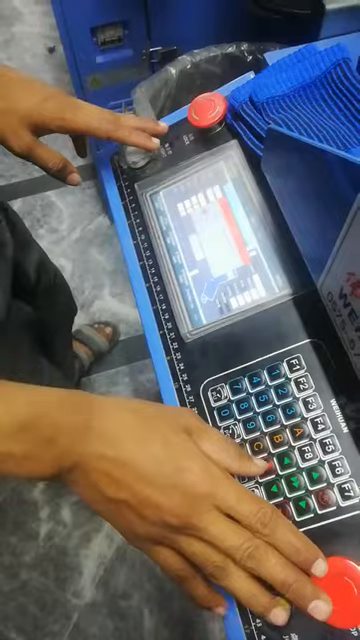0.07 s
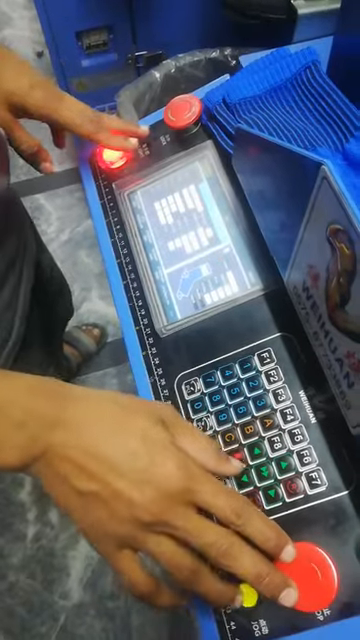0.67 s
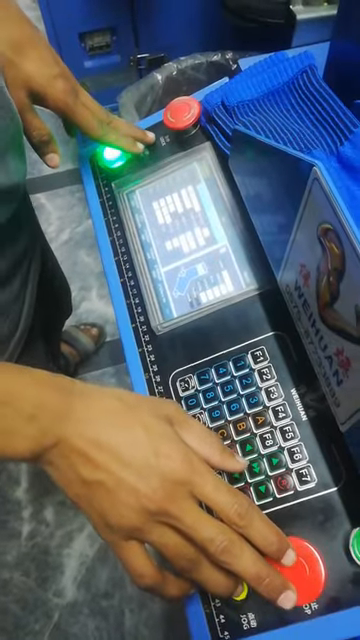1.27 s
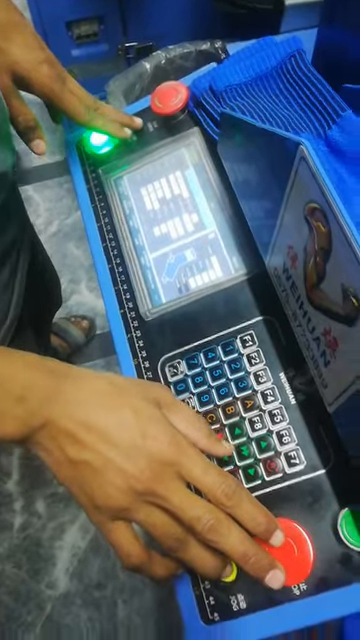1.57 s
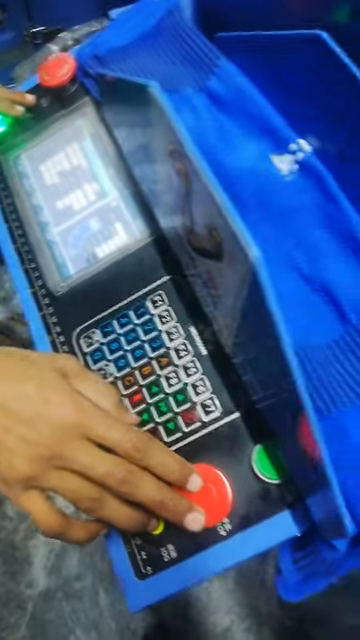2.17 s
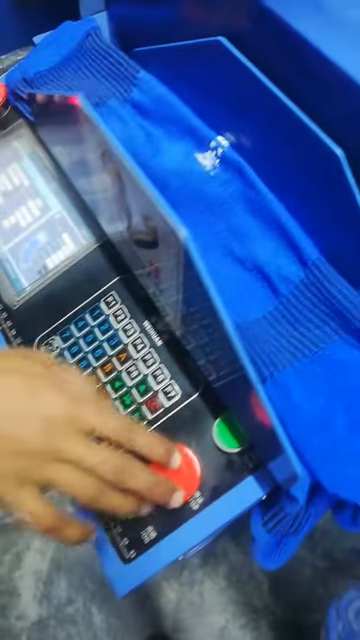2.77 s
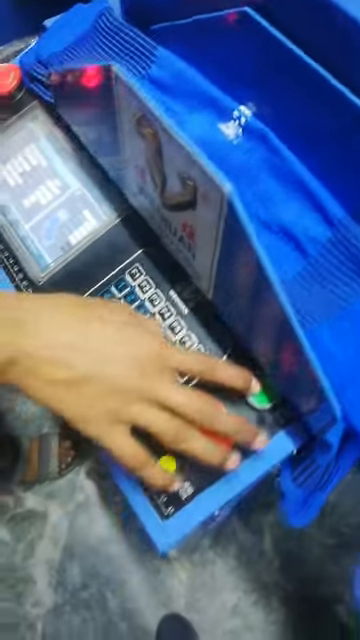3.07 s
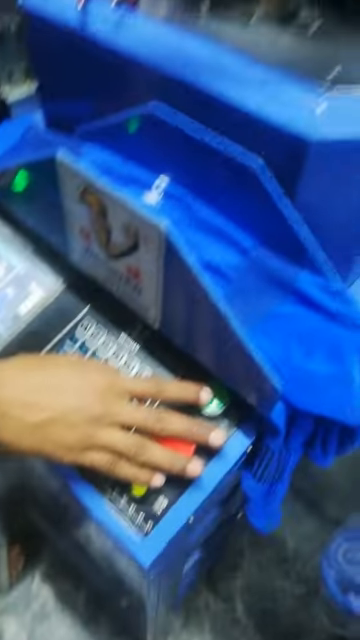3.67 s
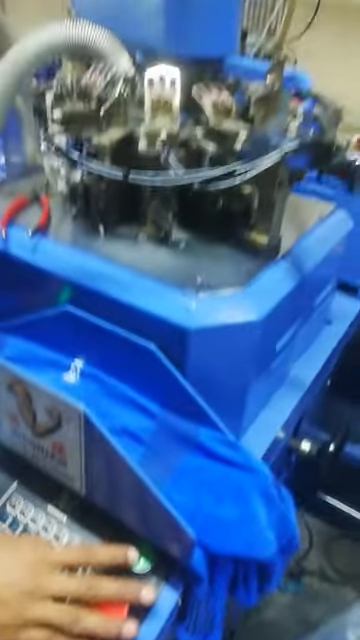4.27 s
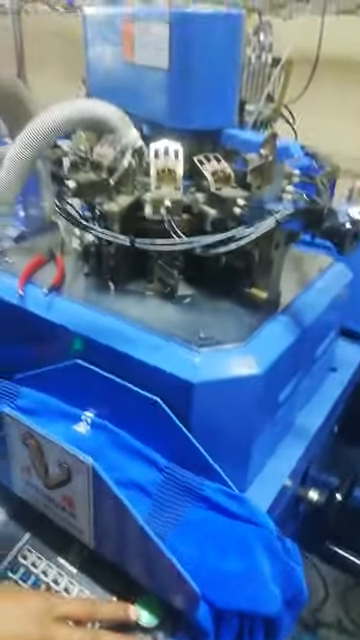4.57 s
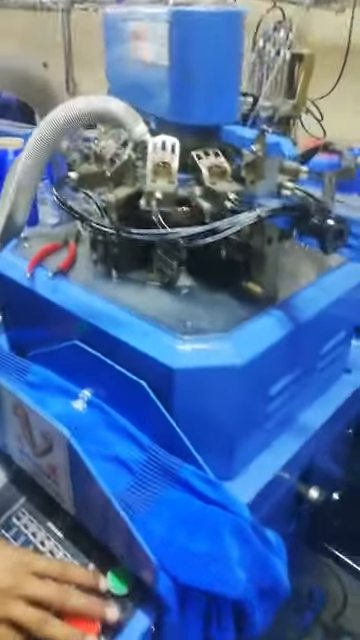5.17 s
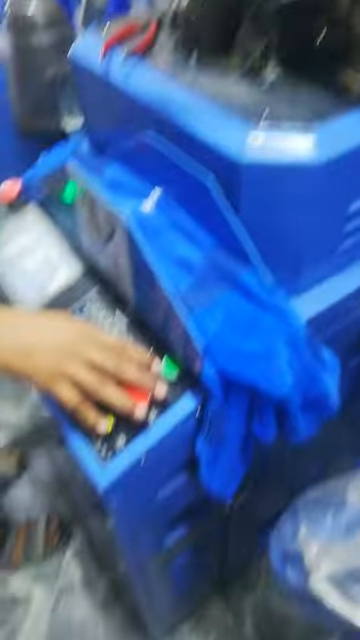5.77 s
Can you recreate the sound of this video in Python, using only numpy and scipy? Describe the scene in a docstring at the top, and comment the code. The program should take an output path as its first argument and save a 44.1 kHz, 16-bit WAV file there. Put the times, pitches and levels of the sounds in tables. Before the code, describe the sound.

Close to a running sock knitting machine in a workshop, a steady drone and whirr mix with air hissing through a pipe and a whine that pulses about four times a second. It starts abruptly, slightly louder for a moment, then evens out. One crisp button click sounds near the microphone on the left. Later a few faint clacks knock inside the machine, and the whole noise becomes slightly fuller.

```python
"""A circular sock knitting machine runs in a workshop, heard close up from its control panel.
Its needles pass the cams in a whine that throbs once a turn; the frame drones, motors hum and beat,
and suction air hisses. The mechanism clacks faintly and a panel button clicks once.
The sound cuts in with an opening swell in which the whole machine sounds louder, then settles.
It sits mostly to the left and grows a little as the microphone turns to the knitting head."""
import sys
import numpy as np
from scipy import signal
from scipy.fft import rfft, irfft
from scipy.io import wavfile

SR = 44100
rng = np.random.default_rng(int(sys.argv[2]) if len(sys.argv) > 2 else 0)


def transcribe(signal):
    """Save signal, clipped to [-1, 1], as a 16-bit WAV file at the path in sys.argv[1]."""
    frames = np.atleast_2d(signal).T
    limited = np.clip(frames, -1, 1)
    pcm = np.round(limited * 32767).astype(np.int16)
    wavfile.write(sys.argv[1], SR, pcm)


N = 265923
TIME = np.arange(N) / SR
FREQS = np.maximum(np.arange(N // 2 + 1) * SR / N, 1)
NEEDLES, TURNS_PER_S = 144, 3.8533
TIGHT_SPOT_S = .497   # the cylinder's tight spot passes the cams now, and once every turn
FRAME_HOLD_S = .15   # the opening swell lasts this much longer in the frame and cams


def from_db(db):
    """Decibels to gain."""
    return 10 ** (np.asarray(db) / 20)


def rms_one(x):
    """Scale so that the mean of the channels has rms 1."""
    return x / np.sqrt(np.mean(np.atleast_2d(x).mean(0) ** 2) + 1e-20)


def in_time(rows):
    """Each column of a curve at every sample."""
    s, *columns = np.transpose(rows)
    return [np.interp(TIME, s, c) for c in columns]


def at_hz(points):
    """A table over log frequency, read at every bin."""
    hz, value = np.transpose(points)
    return np.interp(np.log(FREQS), np.log(hz), value)


def colour(points):
    """Gain of a spectrum that falls away steeply beyond its ends."""
    skirts = np.minimum(FREQS / points[0][0], 1) * np.minimum(points[-1][0] / FREQS, 1)
    return from_db(at_hz(points)) * skirts ** 4


def resonances(modes):
    """Gain of parallel resonances with steep skirts."""
    return sum(from_db(db) / (1 + ((FREQS - hz) / width) ** 2) ** 2 for hz, width, db in modes)


def drift(rate_hz):
    """Slow random wander of rms 1."""
    return rms_one(irfft(rfft(rng.standard_normal(N)) / (1 + (FREQS / rate_hz) ** 2) ** 2, N))


def swells(rows):
    """Rounded, flat-topped bumps, each of its own height."""
    return sum(height / (1 + (2 * (TIME - s) / length) ** 4) for s, length, height in rows)


def opening(lag_s=0, longer_s=0, start_s=.3, attack_s=.11, hold_s=.17, release_s=.13):
    """Envelope of the opening swell, 0-1: the machine sounds louder, then settles."""
    age = TIME - start_s - lag_s
    end = attack_s + hold_s + longer_s + release_s
    return np.clip(np.minimum(age / attack_s, (end - age) / release_s), 0, 1)


# Where the microphone points, from panel to knitting head: (time [s], facing the head [0-1])
MIC_AIM = [(2.6, 0.7), (3.7, 0.5), (4.05, 1), (4.8, 1), (6.03, 1)]
def layer_db(levels, lift):
    """A layer's level at the microphone, from (steady [dB], opening adds [dB], facing head adds [dB])."""
    steady_db, opening_db, facing_db = levels
    facing, = in_time(MIC_AIM)
    return steady_db + opening_db * lift + facing_db * facing


# The longer path to the microphone's right port: (frequency [Hz], delay [s])
RIGHT_DELAY = [(300, 0.00062), (600, 0.00081), (950, 0.00081), (1250, 0.00045), (2000, 0.00055),
               (4000, 0.000425)]
def port_lag(hz):
    """Direct sound bends round the microphone's body and reaches the right port later."""
    return np.interp(hz, *np.transpose(RIGHT_DELAY))


def tone(hz, phase, balance_db):
    """A sine of rms 1 on the left, later and balance_db down on the right."""
    arrival = np.array([TIME, TIME - port_lag(hz)])
    return np.sqrt(2) * np.sin(2 * np.pi * hz * arrival + phase) * from_db([[0], [-balance_db]])


def room_ripple(count=1400):
    """Workshop reflections leave peaks and dips of about a decibel, different at each port."""
    knots = np.linspace(0, SR / 2, count)
    return from_db([np.interp(FREQS, knots, row) for row in rng.standard_normal((2, count))])


# The machine stands to the microphone's left: (frequency [Hz], left over right [dB])
MIC_BALANCE = [(60, .5), (140, 0.9), (210, 1.4), (330, 4), (450, 7.5), (770, 6.8), (1100, 3.5), (1900, 4.8),
               (2800, 8.7), (4500, 12.5), (7500, 9.3), (9500, 12.5), (12000, 9.8), (15000, 17)]
# Direct sound at the right port: (frequency [Hz], share [0-1])
DIRECT_SHARE = [(150, 1), (330, 0.99), (440, 0.57), (900, 0.8), (1100, 0.12), (1350, 0.092), (1900, 0.3),
                (2500, 0.11), (4000, 0.053), (8000, 0.019)]
def at_ports(gain, source=None):
    """Filtered noise, or a source, at the microphone; the right port mixes it with diffuse room noise."""
    left, room = rfft(rng.standard_normal((2, N)))
    if source is not None:
        left = rfft(rms_one(source))
    direct = np.clip(at_hz(DIRECT_SHARE), 0, 1)
    diffuse = np.sqrt(1 - direct ** 2)
    right = direct * left * np.exp(-2j * np.pi * FREQS * port_lag(FREQS)) + diffuse * room
    ports = np.array([left, right * from_db(-at_hz(MIC_BALANCE))])
    return rms_one(irfft(ports * gain * room_ripple() ** diffuse, N))


# The whine's two partials, from the head on the left:
# (multiple of needle rate, lag at the catch [0-1], dip at the catch [0-1], left over right [dB])
WHINE_PARTIALS = [(1, 1, .55, 10), (2, .3, 0, 4.8)]
# Depth of the once-a-turn throb: (time [s], lower partial [0-1], upper partial [0-1])
THROB_DEPTH = [(.3, .5, .9), (1.7, .45, .8), (2.6, .08, 1), (3.5, .04, 1), (4.2, 0, .8), (6.03, 0, .8)]
# The stitch cams ease off and the lower partial dips:
# (place after the tight spot [turns], width [turns], depth [0-1])
CAM_EASINGS = [(.22, .08, .58), (.53, .05, .4)]
# The upper partial sings out: (time [s], length [s], boost [dB])
UPPER_SWELLS = [(2.7, 1.5, 3.8)]
def needle_whine(catch_lead_s=.062, catch_sharpness=.78):
    """Needles pass the cams; once a turn the cylinder catches, so the tone dips, lags and recovers."""
    angle = 2 * np.pi * TURNS_PER_S * (TIME - TIGHT_SPOT_S)
    catch = 1 - catch_sharpness * np.exp(1j * (angle + 2 * np.pi * TURNS_PER_S * catch_lead_s))
    place = angle / (2 * np.pi) % 1
    contact = 1 - sum(depth * np.exp(-((place - at) / width) ** 2) for at, width, depth in CAM_EASINGS)
    lift = opening(lag_s=.031, longer_s=FRAME_HOLD_S)
    lower = contact * from_db(layer_db((-41.8, 3.8, 5), lift))
    upper = from_db(layer_db((-40.2, 5.8, -8), lift) + swells(UPPER_SWELLS))
    out = 0
    for partial, depth, gain in zip(WHINE_PARTIALS, in_time(THROB_DEPTH), (lower, upper)):
        multiple, lag, dip, balance_db = partial
        throb = (1 + depth * np.cos(angle)) * np.minimum(np.abs(catch), 1) ** dip
        out += gain * throb * tone(multiple * NEEDLES * TURNS_PER_S, lag * np.angle(catch), balance_db)
    return out


# Clear tones near the head: (multiple of turn rate, relative level [dB], left over right [dB])
CAM_HARMONICS = [(125, -53, 8), (132, -50.5, 8), (147, -51, 8), (234, -53, 5), (252, -51.5, 5),
                 (282, -47.5, 4), (283, -49.5, 4), (285, -48.5, 4), (291, -51, 4), (297, -49, 4)]
def cam_tones(pulse_turns=.1):
    """The cams sing, louder as the microphone faces them; their tones beat and fall in step once a turn."""
    facing, = in_time(MIC_AIM)
    in_step = 2 * np.pi * (TURNS_PER_S * TIGHT_SPOT_S + pulse_turns)
    tones = sum(from_db(db) * tone(multiple * TURNS_PER_S, -multiple * in_step, balance_db)
                for multiple, db, balance_db in CAM_HARMONICS)
    return from_db(-12 * (1.5 - facing)) * tones


# Parts that the needles rattle: (frequency [Hz], width [Hz], relative level [dB])
CAM_MODES = [(500, 30, -5.5), (945, 75, -9), (1088, 45, -9), (1148, 32, -5.5), (1930, 250, -6.5)]
def needle_rattle(scatter=.26, throb=.025):
    """Each needle hits the cams with a force of its own, so the rattle repeats turn after turn."""
    passes = np.arange(int(N / SR * NEEDLES * TURNS_PER_S))
    force = rng.standard_normal(NEEDLES)[passes % NEEDLES] + scatter * rng.standard_normal(len(passes))
    play = rng.random(NEEDLES)[passes % NEEDLES]   # each sits a little early or late in its slot
    hit_samples = ((passes + play) * SR / (NEEDLES * TURNS_PER_S)).astype(int)
    hits = np.bincount(hit_samples, force, N)[:N]
    swell = 1 + throb * np.cos(2 * np.pi * TURNS_PER_S * (TIME - TIGHT_SPOT_S))
    return at_ports(resonances(CAM_MODES), hits * swell)


# The frame's low drone and midrange whirr, from the panel: (frequency [Hz], relative level [dB])
DRONE_SPECTRUM = [(25, -23), (40, -18), (50, -22), (76, -16), (95, -6), (150, -5), (220, -3.5), (270, -1.5),
                  (330, 0), (385, -2), (450, -7.5), (600, -48)]
WHIRR_SPECTRUM = [(330, -10), (430, -1.5), (500, 3.5), (595, 1), (670, 2), (760, -0.5), (850, 1),
                  (930, 2.5), (1030, 0.5), (1150, 0), (1500, -17.5)]
# The drone briefly rises or dips: (time [s], length [s], change [dB])
DRONE_CHANGES = [(.67, 0.072, 4), (4.22, 0.1, 3.5), (5.37, 0.066, -1), (5.8, 0.14, 2)]
def frame(whirr_follows_drone=.12):
    """The frame drones and whirrs, and the needles rattle in it."""
    lift, change_db = opening(longer_s=FRAME_HOLD_S), swells(DRONE_CHANGES)
    drone = from_db(layer_db((-42, 4, -2.1), lift) + change_db) * at_ports(colour(DRONE_SPECTRUM))
    whirr_db = layer_db((-42, 3, 3), lift) + whirr_follows_drone * change_db
    whirr = from_db(whirr_db) * at_ports(colour(WHIRR_SPECTRUM))
    rattle = from_db(layer_db((-49.5, 3, 5), lift)) * needle_rattle()
    return drone + whirr + rattle


# Motor and fan tones: (frequency [Hz], level [dB], left over right [dB], facing the head adds [dB])
MOTOR_TONES = [(100.2, -66, -2, 9), (275.3, -50, -1, -6), (1680, -53, 17, 3)]
def motors(waver_db=2, wander_rad=.22):
    """Motors and fans hum, wavering in the room."""
    facing, = in_time(MIC_AIM)
    out = 0
    for hz, db, balance_db, facing_db in MOTOR_TONES:
        gain = from_db(db + facing_db * facing + waver_db * drift(3.8))
        out += gain * tone(hz, wander_rad * drift(1.5), balance_db)
    return out


# The stronger drive motor at the left port: (time [s], level [dB])
DRIVE_CURVE = [(.4, -41), (.65, -44), (.85, -58), (1.8, -52), (2.5, -56), (3.0, -48), (3.3, -50),
               (3.55, -47), (4.2, -44.5), (4.6, -50), (5.3, -44), (5.65, -52), (5.9, -48)]
def drive(hz=348.2, beat_hz=.86, null_s=3.85, second_db=-3, balance_db=4.5):
    """Two drive motors of nearly the same speed beat about once a second."""
    level_db, = in_time(DRIVE_CURVE)
    slip = -2 * np.pi * beat_hz * (TIME - null_s)
    pair = tone(hz, 0, balance_db) - from_db(second_db) * tone(hz, slip, balance_db)
    return from_db(level_db) * pair


# Air in the pipe, hiss at its mouth and the highest spray: (frequency [Hz], relative level [dB])
RUSH_SPECTRUM = [(700, -22), (1250, -5), (1500, 0), (1900, -1), (2300, 1), (2700, -3), (3600, -15.5)]
HISS_SPECTRUM = [(2000, -24), (2800, -1.5), (3450, 1.5), (4000, 0), (4800, -0.5), (5600, -3.5), (6600, -5),
                 (10000, -24)]
SPRAY_SPECTRUM = [(4000, -13), (6500, -2.5), (8000, 0.5), (10000, -2), (12500, -5), (15500, -6.5)]
# The pipe's resonances: (frequency [Hz], width [Hz], relative level [dB])
PIPE_MODES = [(2010, 200, -3), (2460, 320, 0)]
# They ring out as the opening swell ends: (time [s], length [s], boost [dB])
PIPE_BOOST = [(.7, 0.29, 21.8)]
def suction(flutter_db=.58, spray_flutter_db=.6, pipe_db=-68):
    """Air rushes through the suction pipe and hisses at its mouth, fluttering a little."""
    lift, flutter = opening(), drift(9.7)
    rush_db = layer_db((-41.5, 2.5, 2.5), opening(longer_s=FRAME_HOLD_S / 2)) + flutter_db * flutter
    hiss_db = layer_db((-39, 3.5, 1.35), lift) + flutter_db * flutter
    spray_db = layer_db((-44.5, 3, 4), lift) + spray_flutter_db * flutter
    rush = from_db(rush_db) * at_ports(colour(RUSH_SPECTRUM))
    hiss = from_db(hiss_db) * at_ports(colour(HISS_SPECTRUM))
    pipe = from_db(pipe_db + swells(PIPE_BOOST)) * at_ports(resonances(PIPE_MODES))
    spray = from_db(spray_db) * at_ports(colour(SPRAY_SPECTRUM))
    return rush + hiss + pipe + spray


# The workshop floor underfoot: (frequency [Hz], relative level [dB])
FLOOR_SPECTRUM = [(14, 3.5), (20, -12), (30, -12), (42, -20)]
# Rises of the floor's rumble and of the low hum: (time [s], length [s], boost [dB])
FLOOR_RISES = [(3.4, 0.96, 8), (5.37, 0.18, 9)]
HUM_RISES = [(4.9, 0.42, 6)]
# Cabinet panels near the microphone: (frequency [Hz], width [Hz], relative level [dB])
CABINET_MODES = [(134, 10, 1), (172.8, 35, -1.5)]
# Short low booms, each on its own note, sometimes overlapping:
# (time [s], length [s], frequency [Hz], level [dB])
LOW_BOOMS = [(0.817, 0.25, 166, -39.5), (0.887, 0.084, 135, -40), (1.271, 0.24, 137, -46),
             (1.56, 0.16, 169, -47), (1.88, .2, 180, -44.5), (2.742, .07, 133, -40), (3.35, 0.15, 166, -45),
             (4.3, .13, 145, -45), (4.64, 0.21, 136, -43.5)]
def vibration(hum_hz=56.2):
    """The machine shakes the floor and its cabinet panels, and a low hum swells."""
    lift = opening(longer_s=FRAME_HOLD_S)
    floor = from_db(layer_db((-67, 4, 20), lift) + swells(FLOOR_RISES)) * at_ports(colour(FLOOR_SPECTRUM))
    hum = from_db(layer_db((-68, 2, 9.5), lift) + swells(HUM_RISES)) * tone(hum_hz, .55 * drift(2), 0)
    booms = sum(from_db(db) * swells([(s, length, 1)]) * tone(hz, rng.uniform(0, 2 * np.pi), 1)
                for s, length, hz, db in LOW_BOOMS)
    cabinet = from_db(layer_db((-47.3, 4, -.5), lift)) * at_ports(resonances(CABINET_MODES))
    return floor + hum + booms + cabinet


# Faint clacks from inside the machine: (time [s], steel ring [dB], dull knock [dB], t60 [s])
CLACK_HITS = [(1.482, -37, -45, .05), (3.283, -40, -42, .14), (3.298, -39, -36.5, .13),
              (3.858, -28, -42, .075), (3.948, -37, -40, .12), (4.872, -42, -39, .08),
              (5.009, -37, -45, .05), (5.349, -35, -45, .07)]
# The steel parts and the housing: (frequency [Hz], width [Hz], relative level [dB])
STEEL_MODES = [(2300, 500, -9), (3068, 280, -4), (3530, 330, 0), (4600, 500, -3.5), (6400, 800, -6)]
HOUSING_MODES = [(600, 200, -2), (1500, 260, 0), (2250, 300, 0)]
def clacks():
    """Small knocks ring steel parts of the mechanism and thud in its housing, blurred by the room."""
    ring = knock = 0
    for s, ring_db, knock_db, t60 in CLACK_HITS:
        decay = (TIME > s) * from_db(-60 * np.minimum(np.abs(TIME - s) / t60, 2))
        ring += from_db(ring_db) * decay
        knock += from_db(knock_db) * decay
    return ring * at_ports(resonances(STEEL_MODES)) + knock * at_ports(resonances(HOUSING_MODES))


# The button's snap and rebound, close to the left port: (time [s], level [dB])
BUTTON_SNAPS = [(1.8020, -9.1), (1.8034, -20)]
# Its plastic body: (frequency [Hz], relative level [dB], t60 [s])
PLASTIC_MODES = [(3650, -15, .013), (4750, -10, .005), (5800, -9, .004), (7550, -6, .004), (8650, .5, .005),
                 (11650, -3, .0035), (12600, -5, .003), (14000, -9, .002), (15200, -8, .003)]
def button(right_db=-27, tail_db=-24, tail_t60=.019):
    """A snap rings the button's short plastic modes; nearby panels scatter a brief tail."""
    click = np.zeros((2, N))
    for s, db in BUTTON_SNAPS:
        age = np.maximum([TIME - s, TIME - s - port_lag(SR / 2)], 0)
        for k, (hz, mode_db, t60) in enumerate(PLASTIC_MODES):
            decay = from_db(db + mode_db - 60 * np.minimum(age / t60, 4))
            click += (-1) ** k * decay * np.sin(2 * np.pi * hz * age)
    snap_s, snap_db = BUTTON_SNAPS[0]
    scattered = at_ports(resonances([(hz, 500, db) for hz, db, _ in PLASTIC_MODES]))
    fade = (TIME > snap_s) * from_db(snap_db + tail_db - 60 * np.abs(TIME - snap_s) / tail_t60)
    return click * from_db([[0], [right_db]]) + scattered * fade


def scene():
    """The running machine and the button, heard from the control panel."""
    machine = needle_whine() + cam_tones() + frame() + motors() + drive() + suction() + vibration()
    return machine + clacks() + button()


def record(dry, start_s=.309, thump_db=-27, settle_s=.088, cutoff_hz=15500):
    """The microphone cuts in abruptly with a soft low thump, and the highest treble is cut."""
    thump = -from_db(thump_db) * np.exp(-np.abs(TIME - start_s) / settle_s)
    opened = (dry + thump) * (TIME >= start_s)
    return signal.sosfilt(signal.ellip(10, .1, 80, cutoff_hz, fs=SR, output="sos"), opened)


dry = scene()
out = record(dry)
transcribe(out)
```